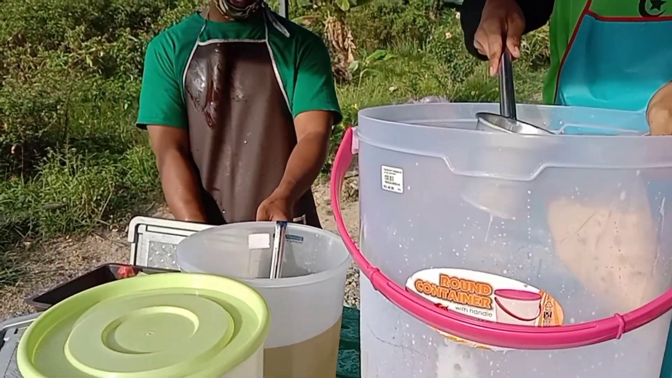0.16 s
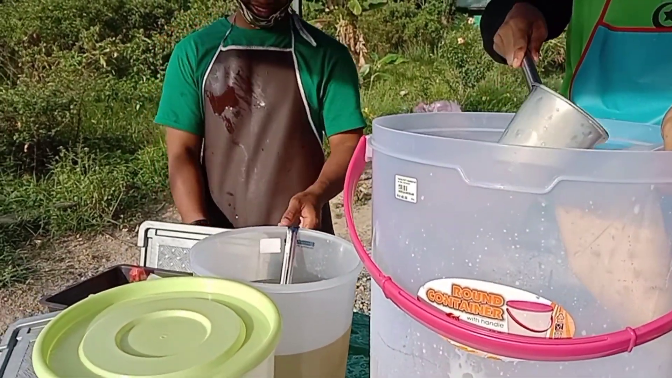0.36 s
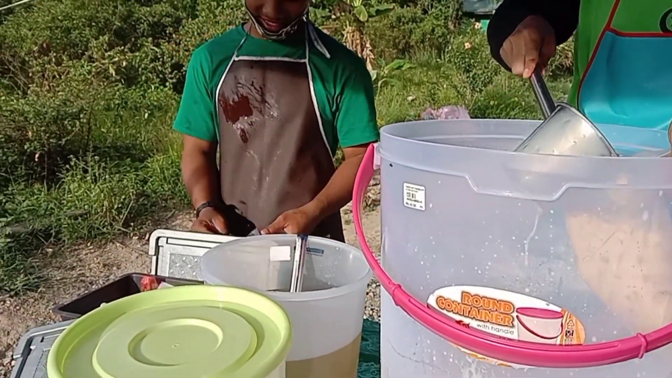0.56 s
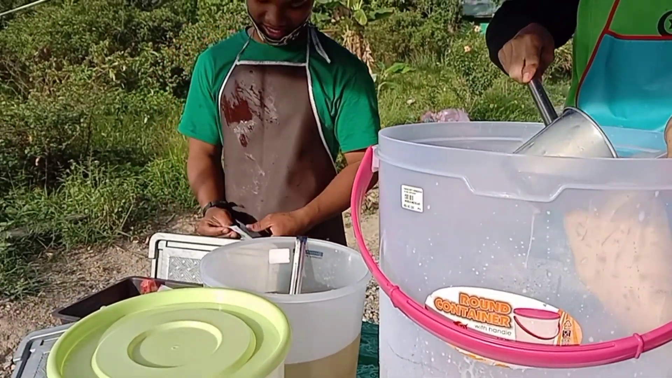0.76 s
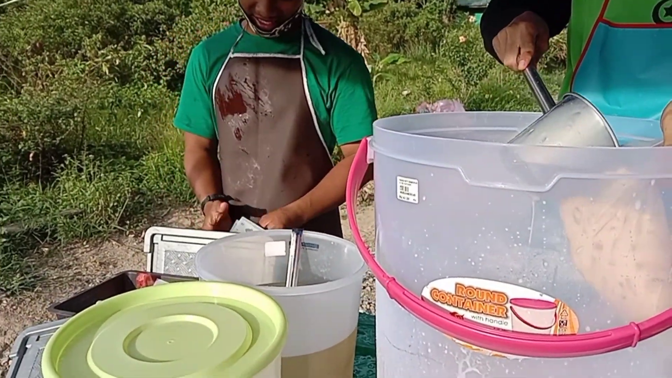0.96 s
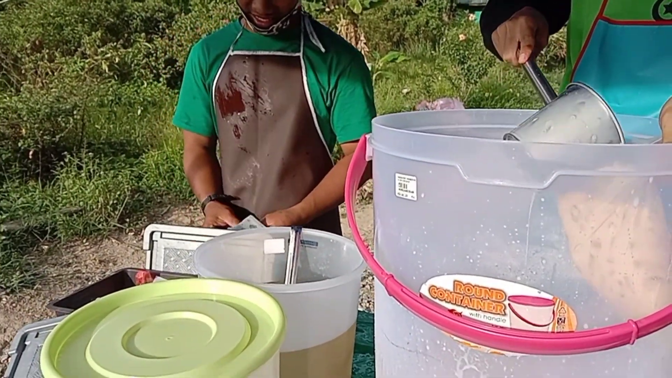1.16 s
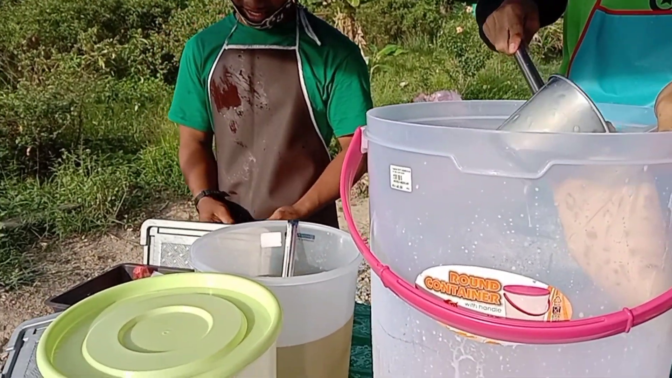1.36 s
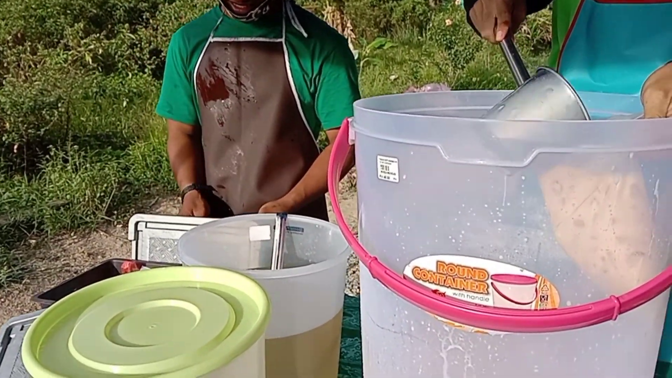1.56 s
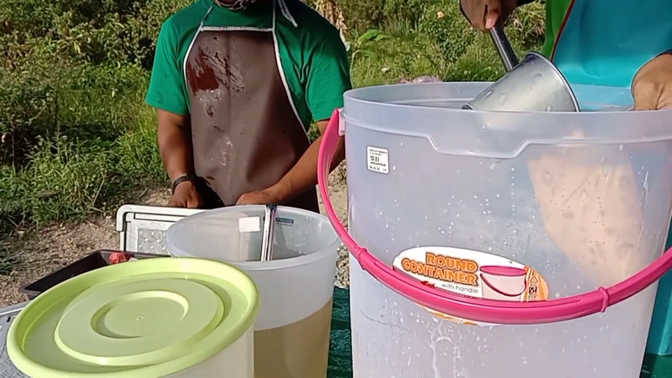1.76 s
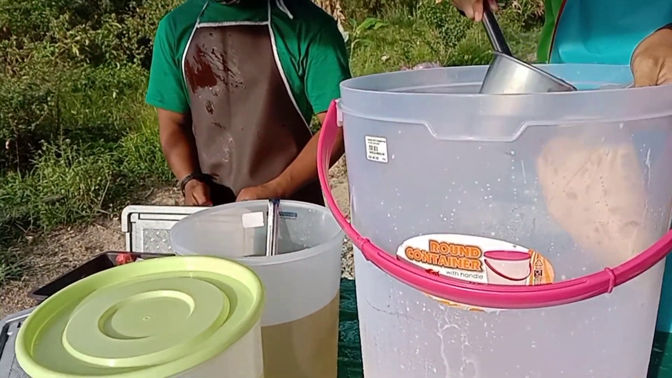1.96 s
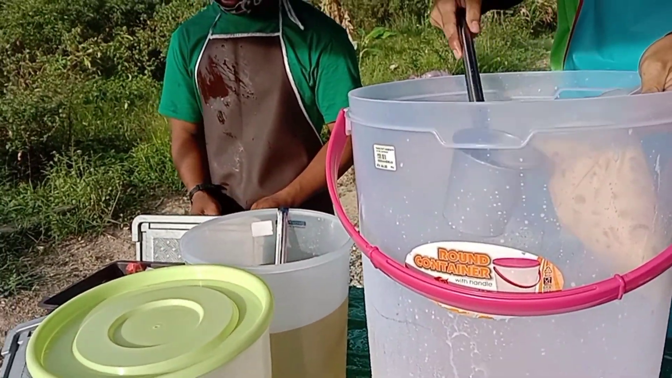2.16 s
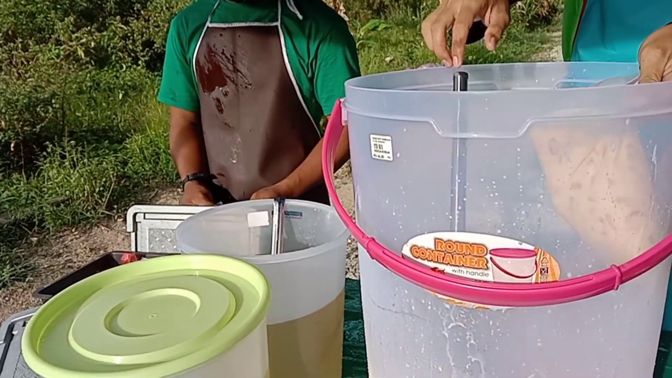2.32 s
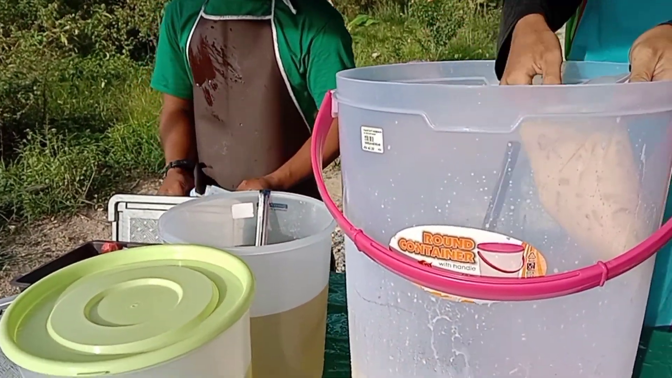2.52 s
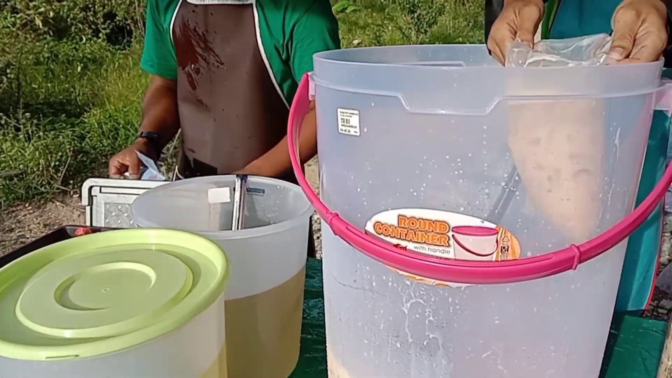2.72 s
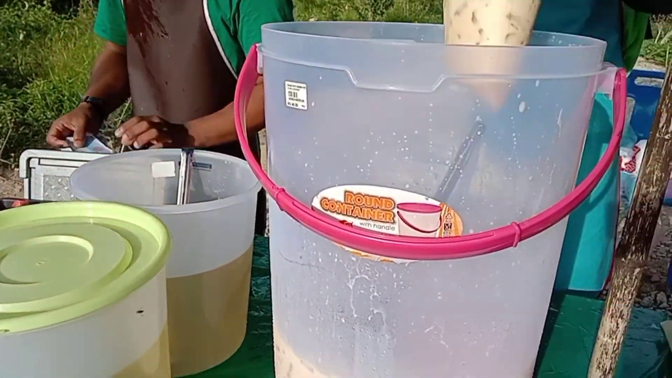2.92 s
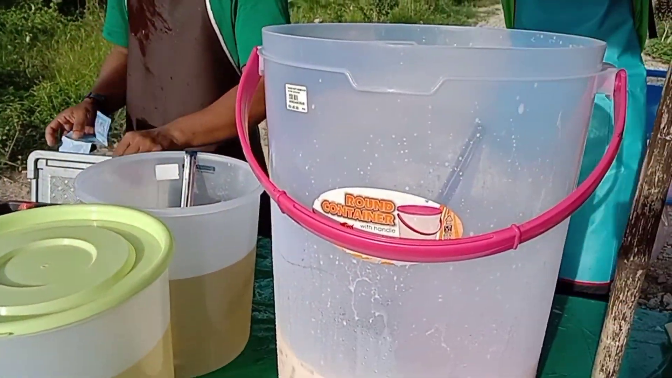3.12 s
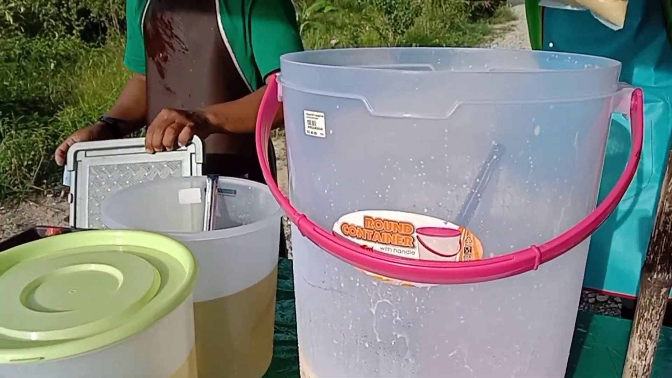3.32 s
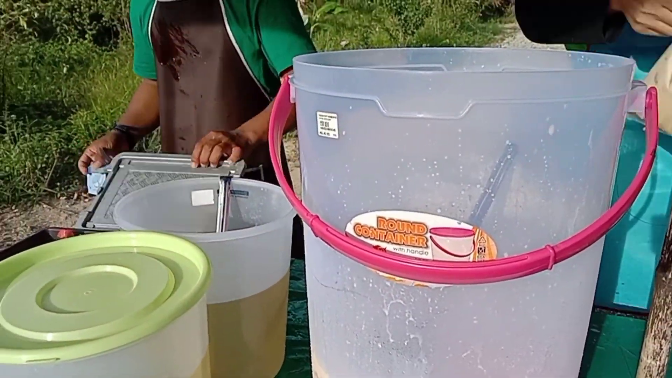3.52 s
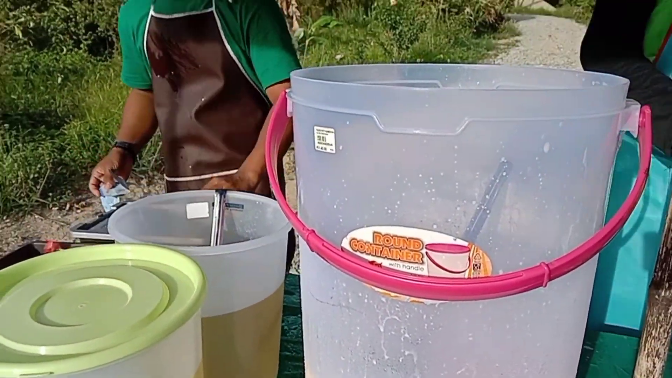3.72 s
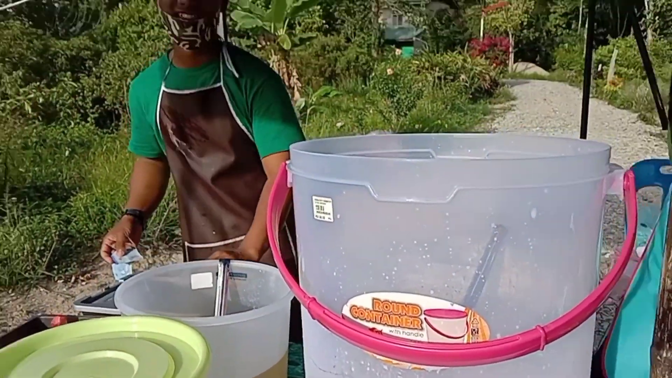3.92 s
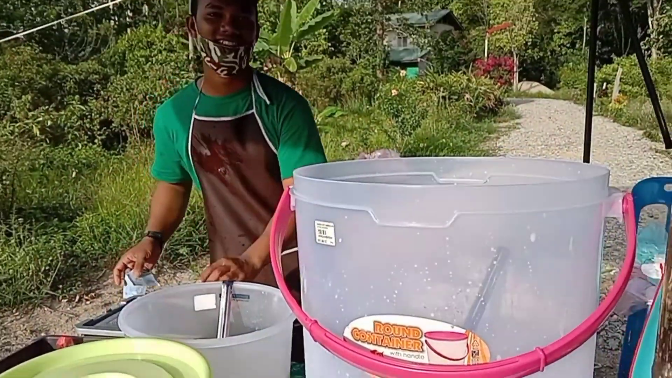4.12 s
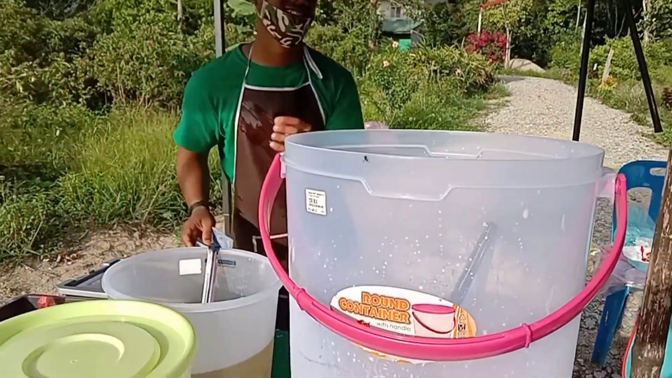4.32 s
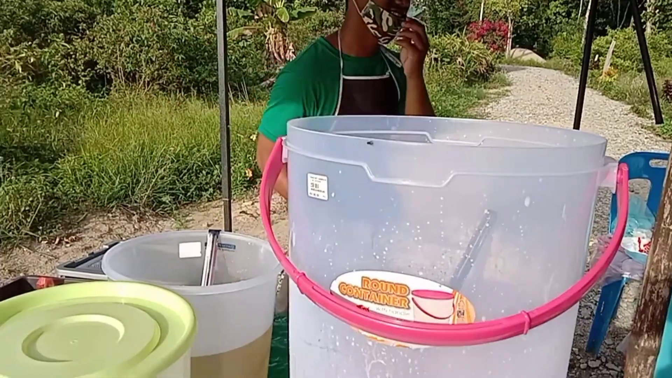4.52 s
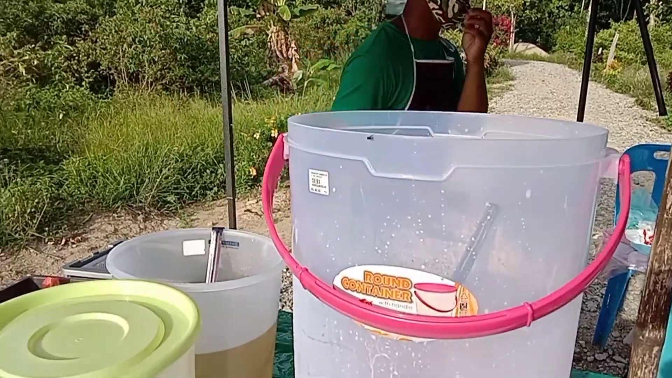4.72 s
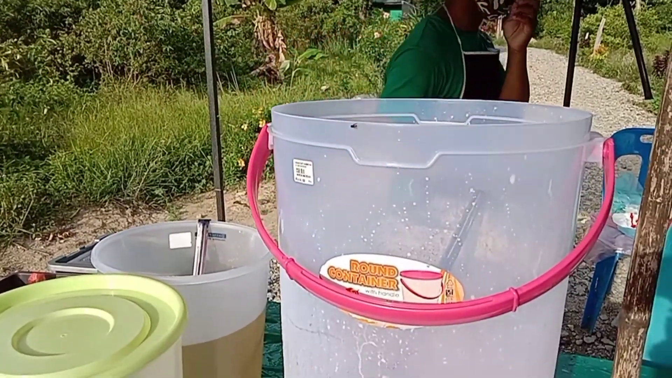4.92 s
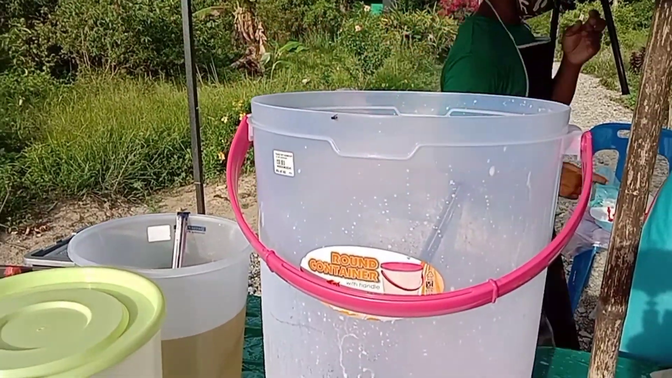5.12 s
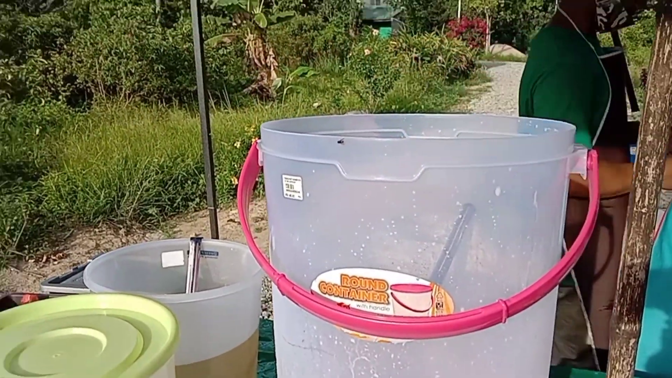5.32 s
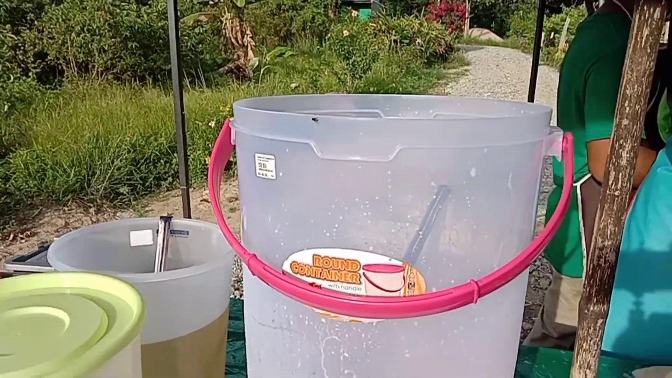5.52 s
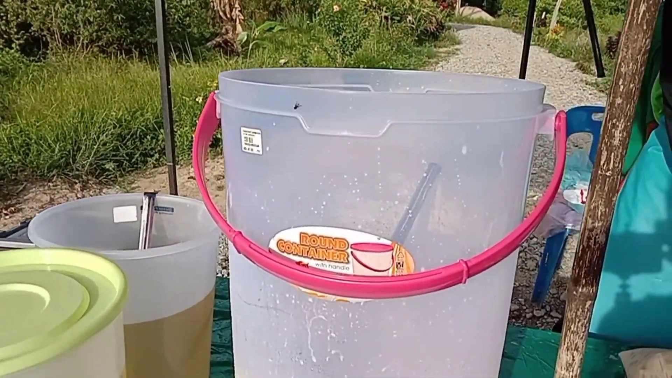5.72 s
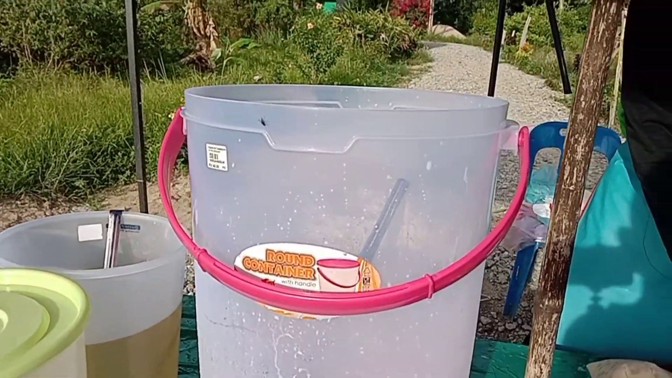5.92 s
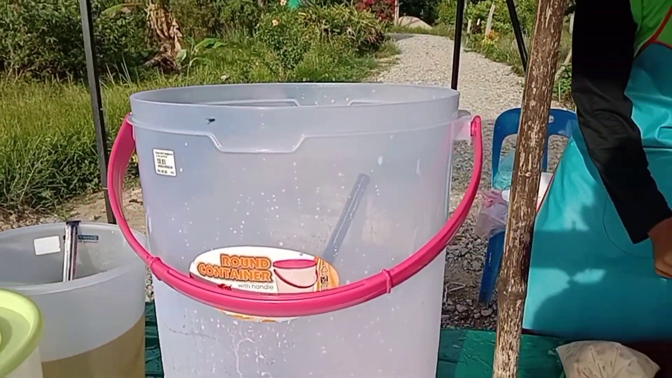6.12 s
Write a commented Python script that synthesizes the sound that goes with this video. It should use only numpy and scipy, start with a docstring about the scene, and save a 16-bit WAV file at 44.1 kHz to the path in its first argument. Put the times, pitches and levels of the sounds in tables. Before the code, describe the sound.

A metal ladle knocks in a plastic bucket and pours drink onto ice, then a thin plastic bag crinkles and a lid shuts.

```python
"""Roadside drink stall

A metal ladle scrapes and knocks in a big plastic bucket, ringing its wall, pours a drink that patters
and bubbles into a bag of ice, and is dropped back in. The lid of an ice box rubs, knocks and falls shut.
The thin plastic bag crinkles as it is gathered and tied, its creases buckling in swarms and single snaps.
Behind it all a small engine throbs far away, in faint open-air hiss with a thin insect whine."""
import sys
import numpy as np
from scipy import signal
from scipy.fft import rfft, irfft
from scipy.io import wavfile
from scipy.ndimage import uniform_filter1d

SR = 44100
rng = np.random.default_rng(int(sys.argv[2]) if len(sys.argv) > 2 else 0)


def log_audio(samples):
    """Write samples as a 16-bit WAV file to the path given in sys.argv[1]."""
    # one column per channel
    frames = np.atleast_2d(samples).T
    # limit to full scale, then quantise
    limited = np.clip(frames, -1, 1)
    pcm = np.round(limited * 32767).astype(np.int16)
    wavfile.write(sys.argv[1], SR, pcm)


N = 276663
RING_S = np.arange(SR // 2) / SR   # time axis of one ring-out

# Levels in the tables are relative; t60 is the time to die away by 60 dB.
# tone of the open air: (frequency [Hz], level [dB])
AIR_SPECTRUM = [(18, -53.5), (30, -13), (161, 0.5), (569, -12), (1130, -14), (1390, -17), (1860, -23.5),
                (3400, -21), (4080, -18.5), (5590, 0.5), (9460, -10), (14800, -11), (16000, 3.5)]
# swell and fade of the far engine: (time [s], level [dB])
ENGINE_LEVELS = [(0.0, -56.5), (0.52, -66), (1.2, -64), (1.5, -68.5), (2.38, -73), (2.8, -68), (3.3, -71.5),
                 (6.27, -76)]
# tone of one exhaust puff: (frequency [Hz], level [dB])
EXHAUST_SPECTRUM = [(30, -45), (60, -7.5), (90, -9), (120, -2.5), (150, 3.5), (180, 4), (210, -8.5),
                    (260, -34.5), (310, -6), (400, -22), (900, -32)]

# the lid hitting the ice box: (time [s], level [dB], boom [dB], boom pitch [Hz], treble [dB], t60 [s])
LID_KNOCKS = [(3.411, -35, -10, 476, 10.5, .1), (3.443, -38, 4, 166, -20, .08),
              (3.473, -37, -7, 430, 6.5, 0.09), (3.602, -50.5, -19, 296, 10, 0.36),
              (3.67, -45, 25.5, 330, 1, 0.075), (3.821, -22.5, -12.5, 993, 1, .08),
              (3.835, -13, 9, 330, -4, 0.04), (3.841, -25, 1, 180, -7, 0.16),
              (3.858, -26.5, 1.5, 310.3, -4.5, 0.24), (3.94, -44.5, -3, 290, 1, 0.36),
              (3.966, -37.5, -4, 484, 8, 0.072), (4.16, -51.5, 17, 112, 6, 0.067)]
# the lid rubbing on the box: (time [s], length [s], level [dB])
LID_RUBS = [(3.478, 0.048, -46), (3.602, 0.01, -42.5), (3.812, 0.033, -35.5), (3.878, .01, -50),
            (3.913, 0.045, -41.5), (4.151, 0.089, -54.5)]
# resonances of the lid: (frequency [Hz], level [dB], t60 [s])
LID_MODES = [(98.5, -9, 0.42), (200, 1, 0.095), (258, 2, 0.17), (297.4, -8.5, 0.15), (468.4, -14, 0.079),
             (528, -5, 0.085), (793, -9.5, 0.079), (962, -38, 0.065), (1078, -22, 0.14)]
# tone of the lid's clatter: (frequency [Hz], level [dB])
LID_SPECTRUM = [(35, -39), (60, -33.5), (330, -3.5), (651, -21), (1010, -13.5), (1910, -21), (3420, -21),
                (4030, -29), (5720, -20.5), (14900, -45), (16000, -37)]

# tone of the crinkling film: (frequency [Hz], level [dB])
BAG_SPECTRUM = [(450, -44), (700, -26.5), (1100, -29), (1350, -11.5), (1700, -6.5), (2050, -5.5),
                (2600, -7), (3300, -0.5), (4100, -6), (5300, 6.5), (7200, 5), (9500, -5), (16000, -3.5)]
# hollow resonances of the pouch: (frequency [Hz], level [dB], t60 [s])
POUCH_MODES = [(900, -19, .03), (1325, -5.5, .02), (1455, 2.5, 0.021), (1600, 2.5, .014), (1690, 1, 0.037),
               (1806, -2.5, .015)]
# squeezes that gather and tie the bag: (time [s], length [s], crackle [dB], rustle share [dB])
BAG_SQUEEZES = [(2.793, 0.066, -39.5, -2), (2.875, .025, -33, -3.5), (2.915, 0.035, -42, 3),
                (2.994, 0.04, -49, 7), (3.127, 0.034, -51, 10), (3.164, 0.01, -47.5, -2),
                (3.298, 0.011, -52, -3), (3.346, 0.037, -53, -3), (3.517, 0.063, -53.5, -2),
                (3.613, 0.12, -52.5, -9.5), (3.748, 0.13, -53.5, 1.5), (3.981, 0.015, -48, -14),
                (4.016, 0.05, -43.5, -10), (4.103, 0.11, -42.5, -0.5), (4.185, 0.14, -44.5, 1),
                (4.348, 0.055, -51, -0.5), (4.423, 0.065, -41.5, -2), (4.492, 0.11, -43, -0.5),
                (4.56, .045, -34.5, 2), (4.643, 0.043, -46.5, 1), (4.713, .01, -43.5, -13),
                (4.889, .015, -45, -10.5), (4.757, 0.05, -44, 0), (4.925, 0.014, -35.5, -5),
                (4.958, 0.065, -38.5, 0.5), (5.016, 0.014, -45, 8), (5.073, 0.048, -43.5, 6),
                (5.197, 0.12, -46.5, -0.5), (5.299, 0.0099, -40.5, 9), (5.385, .012, -43, -1.5),
                (5.408, 0.009, -38, 2), (5.462, 0.043, -44.5, -3.5), (5.527, 0.0069, -51.5, -13),
                (5.653, 0.0075, -44.5, 2), (5.748, 0.021, -42.5, -2.5), (5.801, 0.091, -45, 0.5),
                (5.938, 0.011, -49.5, -3.5), (6.002, 0.021, -50, -3), (6.053, 0.031, -44.5, -2),
                (6.222, .035, -50.5, -6)]
# the bag stirring in the hands between squeezes: (time [s], crackle [dB])
BAG_STIRRING = [(2.9, -57.5), (3.2, -67), (4.2, -66), (6.27, -59)]
# single creases snapping: (time [s], level [dB], low share [dB], shiver of the film [dB])
CREASE_SNAPS = [(0.2747, -32, -18, -6), (2.776, -14, -25, 0), (2.89, -21, -21, 15), (2.9646, -20.5, -6, 7),
                (3.001, -28, 13, -2), (3.0446, -26, -12, 6), (3.0795, -25.5, -5, 0), (3.1135, -33, -10, 0),
                (3.1308, -26, 1, 4.5), (3.3431, -34, 3, 11), (3.7925, -26.5, 1, 3.5),
                (3.9432, -26.5, -2, 7), (4.0914, -21.5, -9, -2), (4.132, -21, -8, -2),
                (4.2025, -35, -17, -4), (4.309, -23.5, 18, 0), (4.4175, -22, -12, 7),
                (4.4524, -17, 2, -5.5), (4.4847, -19, 10.5, 4), (4.5635, -13, 2, -2), (4.5777, -18.5, 8, 4),
                (4.598, -16.5, -16, 0), (4.628, -16.5, 2.5, 0), (4.6565, -12.5, -2, 0),
                (4.7671, -23, -23, 3), (4.8085, -27, -10.5, -4.5), (4.9115, -13.5, -8, 2.5),
                (5.026, -19.5, 11, 8.5), (5.084, -18.5, 7, -4.5), (5.1144, -24, -5, 4),
                (5.285, -29, -10, 5), (5.3031, -19, 14.5, -8), (5.3748, -24.5, 10, -1.5),
                (5.6132, -33, -1.5, 8), (5.8286, -25, 13, -1.5), (5.8634, -20.5, -8.5, -4.5),
                (5.8785, -18, -12, -12), (6.0652, -29, -5, 7), (6.0922, -24, -15, 1)]

# drink running onto the ice: (time [s], splash [dB], fizz [dB])
POUR_LEVELS = [(0.56, -80.5, -63.5), (0.658, -53, -46.5), (0.736, -62, -55.5), (0.928, -51.5, -43.5),
               (1.048, -45.5, -47), (1.122, -49, -45), (1.304, -57, -50), (1.44, -58, -49.5),
               (1.69, -76, -65), (1.908, -69, -65), (2.148, -82, -101), (2.43, -63, -47.5)]
# tone of the splashing: (frequency [Hz], level [dB])
SPLASH_SPECTRUM = [(240, -58), (400, -32.5), (865, -9.5), (1180, -15.5), (1420, -4), (2590, -7), (2840, -4),
                   (4110, -11.5), (5350, -4), (9180, -14), (14800, -21), (16000, -13.5)]
# ice shifting in the bag: (time [s], level [dB], clink pitch [Hz], t60 [s])
ICE_SHIFTS = [(0.906, -33.5, 1970, 0.12), (1.003, -36, 4200, 0.14), (1.012, -35, 2940, 0.06),
              (1.064, -33.5, 2120, 0.073), (1.14, -35, 2820, 0.066), (1.197, -31, 2930, 0.089),
              (1.239, -32.5, 2040, 0.11), (1.309, -63, 5370, 0.088), (1.363, -39, 1310, 0.11),
              (1.441, -36, 6900, 0.094), (1.547, -48, 2570, 0.17), (1.618, -44, 4640, 0.094),
              (1.785, -46, 3350, 0.044), (1.867, -51, 4800, 0.077), (2.065, -52, 2470, 0.22),
              (2.085, -49, 1600, 0.16), (2.112, -41.5, 1310, 0.12), (2.151, -39, 2500, 0.15),
              (2.178, -38.5, 1255, 0.047), (2.342, -45.5, 5320, 0.06), (2.35, -53.5, 2320, .16)]
# single drips from the ladle: (time [s], level [dB], starting pitch [Hz], t60 [s])
LADLE_DRIPS = [(.94, -42, 1420, 0.13), (1.028, -56, 547, 0.12), (1.549, -47.5, 2710, 0.056),
               (1.556, -48, 2300, 0.064), (1.635, -54.5, 792, 0.22), (1.745, -61, 1660, 0.19),
               (1.83, -81, 2200, 0.26), (1.903, -57.5, 1056, 0.14), (2.235, -72, 2200, 0.27)]

# resonances of the bucket's wall and the air in it: (frequency [Hz], level [dB], t60 [s])
BUCKET_MODES = [(146, -19, 0.047), (190, -14.5, .24), (219, -15, .16), (358.8, -8.5, .11),
                (567.4, -1, 0.04), (764, -4, 0.18), (758, -4.5, 0.06), (818, -24, 0.24), (895.4, 1, 0.19),
                (1009, -22, 0.36), (1212, 9, 0.035), (1326, -8, 0.32), (1420, -7.5, .12),
                (1470, -19.5, 0.13), (2200, -16, .1), (2660, -10, 0.053), (2640, -27, 0.067),
                (3350, -9, .09), (3600, -13.5, 0.16)]
# tone of the bucket's crowd of short-lived modes: (frequency [Hz], level [dB])
BUCKET_SPECTRUM = [(41, -42.5), (70, -45.5), (142, -11), (223, -10.5), (285, -13.5), (345, -10.5),
                   (450, -13), (760, 0.5), (1000, -9), (1350, -6.5), (1890, -13), (3400, -12.5),
                   (4190, -20.5), (5750, -14), (9060, -28.5), (15000, -31)]
# ladle strokes through the wet bucket: (time [s], length [s], level [dB], hiss share [dB], t60 [s])
LADLE_SCRAPES = [(0.004, .03, -25, -10.5, 0.3), (.075, 0.099, -27, -10, 0.27), (.277, 0.012, -39, -1, 0.29),
                 (.215, 0.026, -44, 3.5, 0.12), (.335, 0.064, -47.5, 6.5, 0.27),
                 (.475, 0.054, -41.5, -7, 0.15), (2.463, 0.054, -19.5, -10, 0.19),
                 (2.55, 0.044, -29, -8.5, 0.85), (2.71, 0.03, -32, -2, 0.71)]
# the ladle hitting the bucket: (time [s], level [dB], boom [dB], boom pitch [Hz], treble [dB], t60 [s])
LADLE_KNOCKS = [(.013, -27, -9.5, 123, -8, 0.15), (.0715, -22.5, -13, 126, -1, 0.093),
                (.118, -18, -17, 130, -28, 0.034), (.149, -15, 8.5, 219, -5, 0.054),
                (.161, -23, 15, 142, 7.5, 0.11), (.418, -29.5, -38.5, 340, -13.5, 0.099),
                (.4245, -24.5, -7.5, 342, 7, 0.054), (.4325, -19, -22, 320, -3.5, 0.13),
                (.4386, -11.5, 0.5, 783, -11, .04), (.447, -20, 0, 1332, -4.5, 0.062),
                (2.457, -24.5, -12, 179, 8, .08), (2.465, -18, -11.5, 178.7, 14, 0.26),
                (2.480, -14.5, -11.5, 190, -0.5, 0.15), (2.6755, -14, -17, 343, -5, 0.16),
                (2.684, -17.5, 0, 209, 6, 0.097), (2.728, -26, 11, 190, -5, 0.093)]


def amp(db):
    """Decibels to gain."""
    return 10 ** (np.asarray(db) / 20)


def rms_one(x):
    """Scale to unit rms."""
    return x / np.sqrt(np.mean(x ** 2) + 1e-20)


def unit(x):
    """Scale to unit energy."""
    return rms_one(x) / np.sqrt(len(x))


def even(x, size=1500):
    """Hold the short-term level at one."""
    return x / np.sqrt(np.abs(uniform_filter1d(x ** 2, size)) + 1e-4 * np.mean(x ** 2))


def band(x, low_hz, high_hz):
    """Band-pass."""
    edges_hz = [low_hz, min(high_hz, .45 * SR)]
    return signal.sosfilt(signal.butter(2, edges_hz, "band", fs=SR, output="sos"), x)


def split(x, hz):
    """Crossover: the parts below and above a frequency."""
    return [signal.sosfilt(signal.butter(3, hz, kind, fs=SR, output="sos"), x)
            for kind in ("low", "high")]


def through(x, response):
    """Play x through an impulse response."""
    return signal.fftconvolve(x, response)[:len(x)]


def colour(x, spectrum, size=8192):
    """Minimum-phase EQ drawn through (frequency [Hz], level [dB]) points."""
    hz, db = np.transpose(spectrum)
    bin_hz = np.arange(size // 2 + 1) * SR / size
    curve_db = np.interp(np.log(bin_hz + 1), np.log(hz), db)
    cepstrum = irfft(np.log(amp(curve_db)))
    cepstrum[1:size // 2] *= 2
    cepstrum[size // 2 + 1:] = 0
    return through(x, unit(irfft(np.exp(rfft(cepstrum)))))


def add(out, start_s, db, sound):
    """Mix in a hit whose loudest 4 ms have the given level."""
    at = max(round(start_s * SR), 0)
    loudest = np.sqrt(uniform_filter1d(sound ** 2, 176).max())
    out[at:at + len(sound)] += (amp(db) * sound / loudest)[:N - at]


def gains(table, fade_db_per_s=450):
    """Fader curves from rows of (time [s], level [dB], ...), fading out beyond the table's span."""
    t = np.arange(N) / SR
    times, *columns = np.transpose(table)
    outside_s = np.abs(t - np.clip(t, times[0], times[-1]))
    return amp([np.interp(t, times, db) - fade_db_per_s * outside_s for db in columns])


def stroke(start_s, length_s, attack_s, t60):
    """Envelope of one hand movement: it swells about its start, holds, then dies away."""
    t = np.arange(N) / SR - start_s
    return np.clip(t / attack_s + .5, 0, 1) * amp(-60 * np.clip((t - length_s) / t60, 0, 2))


def strokes(table, attack_s):
    """Envelopes of two layers from (time [s], length [s], level [dB], second's share [dB], t60 [s])."""
    main, second = np.zeros((2, N))
    for start_s, length_s, db, share_db, t60 in table:
        power = (amp(db) * stroke(start_s, length_s, attack_s, t60)) ** 2
        main += power
        second += power * amp(share_db) ** 2
    return np.sqrt([main, second])


def burst(t60, click_db):
    """A click followed by a dying scatter of reflections."""
    out = unit(rng.standard_normal(len(RING_S)) * amp(-60 * RING_S / max(t60, .002)))
    out[0] += amp(click_db)
    return unit(out)


def ring(modes, vary_db):
    """Decaying sines; every contact point weights them differently."""
    hz, db, t60 = np.transpose(modes)[:, :, None]
    strength = amp(db + vary_db * rng.standard_normal(hz.shape)) * rng.choice([-1, 1], hz.shape)
    return unit(np.sum(strength * amp(-60 * RING_S / t60) * np.sin(2 * np.pi * hz * RING_S), axis=0))


def ping(hz, t60, rise, size=len(RING_S)):
    """A dying sine whose pitch climbs by the share `rise` in each t60."""
    t = RING_S[:size]
    return amp(-60 * t / t60) * np.sin(2 * np.pi * hz * (t + rise * t * t / (2 * t60)))


def bubbles(count, low_hz, high_hz, t60, rise, spread_db):
    """Bubbles that ring once each, at random times and pitches."""
    out = np.zeros(N)
    for when, pitch, strength in rng.random((count, 3)):
        hz = low_hz * (high_hz / low_hz) ** pitch
        add(out, when * (N - 1) / SR, spread_db * strength, ping(hz, t60, rise, size=1800))
    return rms_one(out)


def grains(per_s, spread_db, t60, click_db, wander_per_s=25, facets=10):
    """Tiny random contacts of uneven size, changing colour as they wander from facet to facet."""
    hits = rng.random(N) < per_s / SR
    sizes = amp(spread_db * np.minimum(rng.exponential(1, N), 4))
    clicks = hits * sizes * rng.choice([-1, 1], N)
    facet = np.cumsum(rng.random(N) < wander_per_s / SR) % facets
    return sum(through(clicks * (facet == k), burst(t60, click_db)) for k in range(facets))


def outdoors(air_db, insect_db, insect_hz):
    """A bed of faint open-air hiss with a thin insect whine."""
    whine = band(rng.standard_normal(N), insect_hz - 45, insect_hz + 45)
    air = colour(rng.standard_normal(N), AIR_SPECTRUM)
    return amp(air_db) * rms_one(air) + amp(insect_db) * rms_one(whine)


def far_engine(trim_db, firings_per_s, first_firing_s):
    """One soft exhaust puff per firing, at a steady speed."""
    cycles = firings_per_s * (np.arange(N + 1) / SR - first_firing_s)
    puffs = colour(np.diff(np.floor(cycles)), EXHAUST_SPECTRUM)
    return amp(trim_db) * gains(ENGINE_LEVELS)[0] * rms_one(puffs)


def lid_rub(trim_db):
    """The lid's edge judders along the ice box."""
    judder = grains(per_s=1200, spread_db=3, t60=.02, click_db=-10)
    clatter = rms_one(colour(judder, LID_SPECTRUM))
    tone = amp(-4.5) * rms_one(through(judder, ring(LID_MODES, vary_db=5.5)))
    pressure = sum(amp(db) * stroke(start_s, length_s, attack_s=.011, t60=.099)
                   for start_s, length_s, db in LID_RUBS)
    return amp(trim_db) * pressure * even(band(clatter + tone, 270, 5100))


def plastic_knocks(table, modes, spectrum, modes_db, click_db, bass_db, treble_hz):
    """Blows on a plastic body: the struck panel booms and a hard edge adds treble."""
    out = np.zeros(N)
    for start_s, db, boom_db, boom_hz, treble_db, t60 in table:
        damping = amp(-20 * RING_S / t60)   # a lingering contact chokes the ring
        tone = unit(ring(modes, vary_db=4.5) * damping)
        clatter = unit(colour(burst(t60, click_db), spectrum))
        low, rest = split(clatter + amp(modes_db) * tone, 440)
        middle, high = split(rest, treble_hz)
        knock = unit(amp(bass_db) * low + middle + amp(treble_db) * high)
        boom = unit(split(ping(boom_hz, t60, rise=0), boom_hz / 2)[1])
        add(out, start_s, db, knock + amp(boom_db) * boom)
    return out


def pouch_ring(shift):
    """The hollow ring of the pouch, all its resonances moved by the share `shift`."""
    modes = [(hz * (1 + shift), db, t60) for hz, db, t60 in POUCH_MODES]
    return unit(band(ring(modes, vary_db=0), 850, 2200))


def bag_crinkle(crackle_db, rustle_db, folds_db, hollow_db, max_shift):
    """Creases buckle in swarms; the pouch's ring shifts in pitch as the bag changes shape."""
    creases = rms_one(grains(per_s=1700, spread_db=3.9, t60=.02, click_db=-9,
                             wander_per_s=110, facets=32))
    shifts = max_shift * np.linspace(-1, 1, 6)
    shape = np.cumsum(rng.random(N) < 20 / SR) % len(shifts)   # about 20 changes a second
    pouch = sum(through(creases * (shape == k), pouch_ring(shift)) for k, shift in enumerate(shifts))
    film = rms_one(colour(creases, BAG_SPECTRUM))
    rustle, crackle = split(film + amp(hollow_db) * rms_one(pouch), 3170)
    squeezes = strokes([(*row, .14) for row in BAG_SQUEEZES], attack_s=.011)   # each with a 0.14 s t60
    stirring = gains(BAG_STIRRING)[0]
    crackle_gain, rustle_gain = np.hypot(squeezes, [stirring, amp(-9) * stirring])
    firmness = (rustle_gain / rustle_gain.max()) ** 1.25   # only a firm squeeze moves the deep folds
    return (amp(crackle_db) * crackle_gain * even(crackle)
            + amp(rustle_db) * rustle_gain * even(rustle)
            + amp(folds_db) * firmness * even(band(creases, 720, 1800)))


def bag_snaps(trim_db, hollow_db, max_shift):
    """A single crease flips at once, then the film shivers and the pouch rings."""
    out = np.zeros(N)
    for start_s, db, low_db, shiver_db in CREASE_SNAPS:
        flip = burst(t60=.006, click_db=-9)
        snap = flip + amp(shiver_db) * burst(t60=.1, click_db=-38)
        pouch = through(snap, pouch_ring(max_shift * rng.uniform(-1, 1)))
        low, high = split(colour(snap, BAG_SPECTRUM) + amp(hollow_db) * pouch, 2450)
        tick = amp(-4) * split(flip, 8240)[1]
        add(out, start_s, db + trim_db, amp(low_db) * low + high + tick)
    return out


def plastic_bag(hollow_db, max_shift):
    """The bag crinkles and snaps; its thin film radiates no bass."""
    crinkle = bag_crinkle(crackle_db=1, rustle_db=-1, folds_db=-52,
                          hollow_db=hollow_db, max_shift=max_shift)
    snaps = bag_snaps(trim_db=-8, hollow_db=hollow_db, max_shift=max_shift)
    return split(crinkle + snaps, 230)[1]


def pour(splash_db, fizz_db):
    """Drops patter and bubble in the bag: splash below, fizz on top."""
    drops = rms_one(grains(per_s=900, spread_db=3, t60=.03, click_db=-14))
    bubbling = amp(-5) * bubbles(count=2000, low_hz=800, high_hz=6000, t60=.035, rise=.03, spread_db=12)
    splash, fizz = split(colour(drops + bubbling, SPLASH_SPECTRUM), 4300)
    splash_gain, fizz_gain = gains(POUR_LEVELS)
    return amp(splash_db) * splash_gain * even(splash) + amp(fizz_db) * fizz_gain * even(fizz)


def ice_cubes(trim_db, clink_db, swell_s):
    """Ice cubes jostle with short wet clinks."""
    out = np.zeros(N)
    swell = 1 - .85 * np.exp(-RING_S / swell_s)   # one cube sets its neighbours moving
    for start_s, db, hz, t60 in ICE_SHIFTS:
        jostle = colour(burst(t60, click_db=-9.5) * swell, SPLASH_SPECTRUM)
        clink = unit(band(jostle, hz / 1.14, hz * 1.175))
        add(out, start_s, db + trim_db, unit(jostle) + amp(clink_db) * clink)
    return out


def ladle_drips(splat_db):
    """Each drip lands with a small splat and a rising plip that scatters inside the bucket."""
    out = np.zeros(N)
    for start_s, db, hz, t60 in LADLE_DRIPS:
        plip = unit(through(ping(hz, t60, rise=.052), burst(t60=.02, click_db=-8)))
        splat = unit(band(burst(t60, click_db=-14), hz / 2, hz * 2))
        add(out, start_s, db, plip + amp(splat_db) * splat)
    return out


def ladle_scrape(body_db, hiss_db, slosh_db):
    """The ladle's edge sticks and slips, ringing the bucket, while the drink sloshes round it."""
    slips = grains(per_s=1600, spread_db=3, t60=.022, click_db=-10, wander_per_s=80, facets=16)
    slosh = bubbles(count=1500, low_hz=550, high_hz=3000, t60=.025, rise=.05, spread_db=9)
    wall = amp(-6) * rms_one(band(through(slips, ring(BUCKET_MODES, vary_db=1)), 550, 1700))
    wet_scrape = rms_one(colour(rms_one(slips) + amp(slosh_db) * slosh, BUCKET_SPECTRUM))
    low, hiss = split(wall + wet_scrape, 3900)
    body = split(low, 210)[1]
    body_gain, hiss_gain = strokes(LADLE_SCRAPES, attack_s=.03)
    return amp(body_db) * body_gain * even(body) + amp(hiss_db) * hiss_gain * even(hiss)


def scene():
    """Mono mix: the close sounds scatter faintly off the stall, over the engine and the open air."""
    ladle = plastic_knocks(LADLE_KNOCKS, BUCKET_MODES, BUCKET_SPECTRUM,
                           modes_db=-5.5, click_db=-10.5, bass_db=-17, treble_hz=1920)
    lid = plastic_knocks(LID_KNOCKS, LID_MODES, LID_SPECTRUM,
                         modes_db=4.5, click_db=-11.5, bass_db=-11.5, treble_hz=1647)
    close = ladle + lid + lid_rub(trim_db=1)
    close += ladle_scrape(body_db=-.5, hiss_db=-1.5, slosh_db=-12.5)
    close += pour(splash_db=-1.5, fizz_db=-3.5)
    close += ice_cubes(trim_db=-3, clink_db=-3, swell_s=.015)
    close += ladle_drips(splat_db=-8)
    close += plastic_bag(hollow_db=-14, max_shift=.04)
    reflections = amp(-15) * band(through(close, burst(t60=.16, click_db=-40)), 100, 3500)
    engine = far_engine(trim_db=.5, firings_per_s=29.76, first_firing_s=.023)
    ambience = outdoors(air_db=-55, insect_db=-72.5, insect_hz=8600)
    return (close + reflections + engine + ambience)[None]


def record(dry):
    """The microphone sheds the deep bass below 45 Hz; the top is cut steeply at 15.7 kHz."""
    thinned = split(dry, 45)[1]
    return signal.sosfilt(signal.ellip(12, .1, 80, 15700, fs=SR, output="sos"), thinned)


dry = scene()
out = record(dry)
log_audio(out)
```